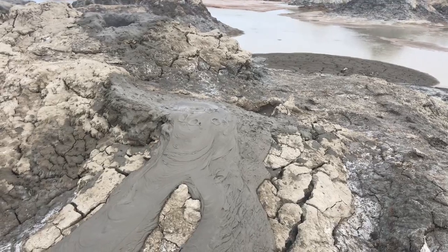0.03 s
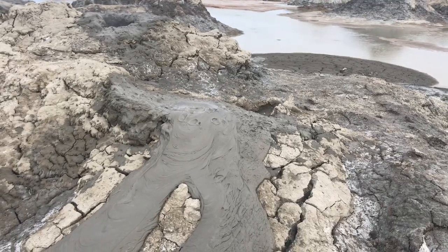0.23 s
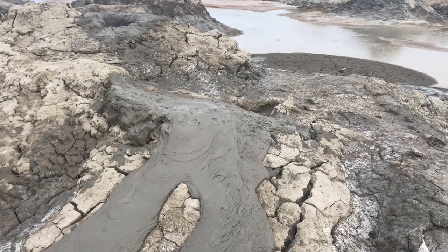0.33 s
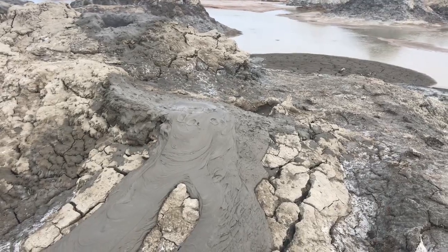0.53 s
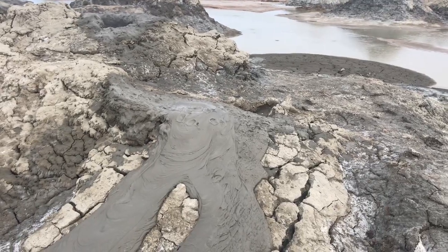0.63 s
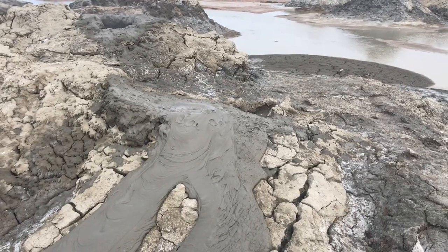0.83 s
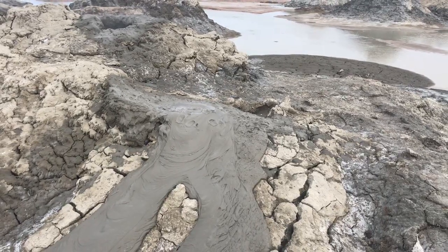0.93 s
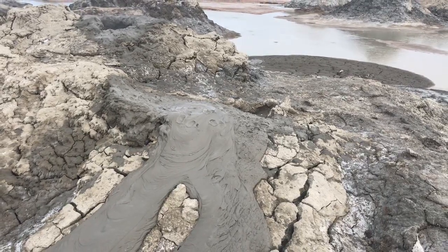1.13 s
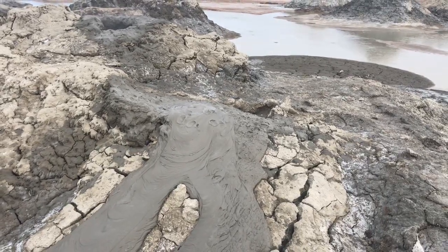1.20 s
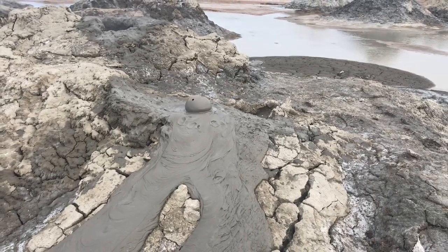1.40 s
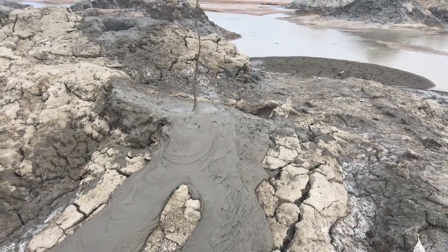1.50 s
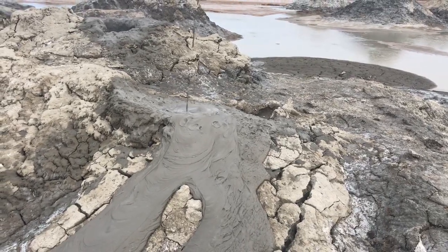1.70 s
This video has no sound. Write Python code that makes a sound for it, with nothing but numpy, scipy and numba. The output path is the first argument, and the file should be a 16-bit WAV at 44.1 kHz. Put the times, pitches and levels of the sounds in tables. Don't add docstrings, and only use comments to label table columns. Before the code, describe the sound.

Gas bubbles bloop and burst through thick wet mud close by, with splats, drips and faint wind rumble.

```python
import sys
import numpy as np
from scipy import signal
from scipy.io import wavfile
from scipy.ndimage import uniform_filter1d
from numba import njit

SR = 44100
rng = np.random.default_rng(int(sys.argv[2]) if len(sys.argv) > 2 else 0)


def put_to_file(sound):
    columns = np.atleast_2d(sound).T
    safe = np.clip(columns, -1, 1)
    whole_steps = np.round(safe * 32767)
    wavfile.write(sys.argv[1], SR, whole_steps.astype(np.int16))


def nominal_scale(level):
    x = np.asarray(level, float) / 20
    return 10 ** x


N = 77175


@njit
def svf(x, hz, width):
    y, band, low = np.empty(len(x)), 0., 0.
    g, k = np.tan(np.pi * hz / SR), width / hz
    for i in range(len(x)):
        v = (band + g * (x[i] - low)) / (1 + g * (g + k))
        band, low, y[i] = 2 * v - band, low + 2 * g * v, k * v
    return y


def unit(x):
    return x / np.sqrt(np.mean(x ** 2))


def smooth(x, size):
    return uniform_filter1d(uniform_filter1d(x, size), size)


def walk(rate, size=N):
    hold = int(SR / rate)
    steps = np.repeat(rng.standard_normal(size // hold + 1), hold)
    return 0.97 * smooth(steps, hold)[:size]


def add(out, s, x):
    i = int(s * SR)
    out[i:i + len(x)] += x[:N - i]


def bands(table, lo_hz, count, flicker_db, rate, tilt_db=0, order=2):
    f, db = np.array(table, float).T
    warm = 8192
    out = 0
    for hz in lo_hz * 2 ** (np.arange(count) / order):
        white = rng.standard_normal(N + warm)
        noise = svf(svf(white, hz, hz / order), hz, hz / order)[warm:]
        colour_db = np.interp(np.log(hz), np.log(f), db) + tilt_db * np.log2(hz / 70)
        out = out + noise * nominal_scale(colour_db + flicker_db * walk(rate))
    return unit(out)


def wind():
    # (time [s], level [dB], tilt [dB per octave])
    gusts = [(0.0, -37.5, -2), (0.1, -47, 1), (0.242, -44, 4), (0.262, -40.5, -3.5), (0.3, -43, 0.5),
             (0.53, -45, 1.5), (0.64, -40, -1), (0.7, -42, -3.5), (0.85, -45.5, 1), (0.9, -40.5, 1.5),
             (0.95, -44, 0.5), (0.98, -40, -3.5), (1.12, -42, -0.5), (1.19, -38, -2), (1.412, -39, -2),
             (1.44, -46, 2), (1.54, -38, -2.5), (1.75, -47.5, 2)]
    # (frequency [Hz], level [dB])
    wind_colour = [(18, -36), (30, -7.5), (50, 0), (80, -3), (151, -16), (220, -19.5), (280, -29),
                   (400, -29.5), (520, -60), (880, -120)]
    s, db, tilt = np.array(gusts).T
    t = np.arange(N) / SR
    tilt_db = np.interp(t, s, tilt)
    rumble = bands(wind_colour, 36.72, count=11, flicker_db=3.5, rate=14.02, tilt_db=tilt_db, order=3)
    hold = int(0.07 * SR)
    return nominal_scale(np.interp(t, s, db)) * rumble / np.sqrt(smooth(rumble ** 2, hold))


def air():
    # (frequency [Hz], level [dB])
    air_colour = [(700, -9), (1350, -3.5), (2600, -11.5), (4900, -20.5), (6200, -11.5), (7200, -17.5),
                  (10300, -23.5), (15500, -22)]
    return nominal_scale(-67) * bands(air_colour, 378.4, count=22, flicker_db=1.0, rate=10.5, order=4)


def ping(hz, t60, tick):
    t = np.arange(int(t60 * SR)) / SR
    tone = np.sin(2 * np.pi * hz * (t + 2 * t ** 2))
    ring = tone * 1000. ** (-t / t60) * (1 - np.exp(-t * hz))
    return ring + tick * np.exp(-t / 0.000081) * np.cos(2 * np.pi * 5000 * t)


def fizz():
    out, per_s = np.zeros(N), 500
    for place, pitch, energy in rng.random((int(per_s * N / SR), 3)):
        hz = 500 * 2 ** (3.165 * pitch)
        level_db = -2.6 * np.log(energy + .02) - 4 * np.log2(hz / 500)
        add(out, place * N / SR, nominal_scale(level_db) * ping(hz, 30 / hz, 0))
    return nominal_scale(-68) * unit(out * nominal_scale(2 * walk(14.2)))


def wet_bursts(table, attack_s):
    out = np.zeros(N)
    t = np.arange(8820) / SR
    for s, t60, db, hz in table:
        env = 1000. ** (-t / t60) * np.clip(t / attack_s, 0, 1)
        rough = nominal_scale(2.5 * walk(700, size=len(t)))
        grains = rng.standard_normal(len(t)) * rough * env
        width = 1.27 * hz
        noise = svf(svf(grains, 1. * hz, width), 1. * hz, width)
        add(out, s, nominal_scale(db) * unit(noise) * np.sqrt(np.mean(env ** 2)))
    return out


def splats():
    # (time [s], t60 [s], level [dB], centre [Hz])
    tears = [(0.197, 0.097, -54, 2830), (0.253, 0.039, -54, 1800), (0.269, 0.056, -57.5, 2500),
             (0.25, .04, -63.5, 9000), (.2, 0.046, -66.5, 10000), (.37, 0.1, -67.5, 8300),
             (0.366, 0.051, -57.5, 2980), (0.15, 0.16, -63.5, 2300), (.296, 0.037, -62, 3300),
             (.315, .05, -60.5, 2600), (.33, .05, -62, 2000), (0.34, 0.04, -58.5, 2400),
             (.406, 0.082, -56, 5700), (.407, .07, -64, 11500), (1.3, .05, -64, 10000),
             (.4, 0.2, -55, 1200), (0.38, 0.06, -65.5, 5300), (.613, 0.2, -58, 1650),
             (0.55, 0.07, -66, 2400), (.65, .05, -58, 1500), (.198, 0.13, -50.5, 450),
             (.252, 0.13, -51.5, 620), (.42, .06, -54.5, 1100), (.33, 0.044, -54, 1000),
             (.93, .08, -66, 700), (1.137, 0.078, -56.5, 1370), (1.452, 0.14, -51, 2450),
             (1.485, 0.12, -62, 4400), (1.546, 0.061, -61.5, 6400), (1.677, 0.043, -61.5, 4000),
             (1.665, 0.051, -57, 1130), (1.31, 0.15, -59.5, 1060), (.955, 0.08, -64.5, 2500),
             (1.2, 0.043, -65, 1300), (1.033, 0.054, -63, 3800)]
    return wet_bursts(tears, attack_s=0.0043)


def glides(table, rise_share):
    out, wobble, flutter = np.zeros(N), walk(300), walk(600)
    for s, length, hz0, hz1, db in table:
        u = np.arange(int(length * SR)) / (length * SR)
        span = slice(int(s * SR), int(s * SR) + len(u))
        small = np.clip(hz0 / 900, 0, 1)
        hz = (hz0 + (hz1 - hz0) * u) * (1 + .025 * small * wobble[span])
        rise = np.clip(u / rise_share, 0, 1)
        fall = np.clip((u - rise_share) / (1 - rise_share), 0, 1)
        env = np.sin(np.pi / 2 * rise) ** 2 * np.cos(np.pi / 2 * fall)
        env = env * unit(nominal_scale(5 * small * flutter[span]))
        add(out, s, np.sqrt(2) * nominal_scale(db) * env * np.sin(2 * np.pi * np.cumsum(hz) / SR))
    return out


def chirps():
    # (start [s], length [s], first pitch [Hz], last pitch [Hz], level [dB])
    openings = [(.1965, 0.02, 240, 620, -35), (.212, 0.042, 528, 555, -49.5), (0.2, 0.043, 1128, 1170, -55),
                (0.255, 0.014, 642, 630, -39.5), (0.25, 0.049, 912, 1004, -51.5),
                (0.279, 0.026, 960, 956, -49), (0.299, 0.025, 429, 341, -50.5),
                (0.611, 0.042, 1572, 1680, -62.5), (.623, 0.0092, 2260, 2350, -61),
                (0.633, 0.01, 2900, 3500, -66.5), (.652, 0.0063, 980, 1870, -53),
                (.654, .008, 1670, 1910, -54), (1.486, 0.006, 700, 795, -41), (1.515, 0.017, 655, 735, -66),
                (.6, 0.028, 229, 198, -52), (1.67, 0.014, 1195, 1400, -59.5)]
    return glides(openings, rise_share=0.083)


def bubble(table):
    s, hz, db = np.array(table, float).T
    t = np.arange(s[0], s[-1], 1 / SR)
    edge = np.clip(np.minimum(t - s[0], s[-1] - t) / 0.0015, 0, 1)
    tone = np.sin(2 * np.pi * np.cumsum(np.interp(t, s, hz)) / SR)
    out = np.zeros(N)
    add(out, s[0], np.sqrt(2) * edge * nominal_scale(np.interp(t, s, db)) * tone)
    return out


def deep_bubble():
    # (time [s], pitch [Hz], level [dB])
    course = [
        (0.198, 163, -35),
        (0.206, 183, -20),
        (0.22, 179.6, -17),
        (0.274, 168, -46),
        (0.284, 180, -65.5),
    ]
    return bubble(course)


def drips():
    # (time [s], pitch [Hz], level [dB], t60 [s])
    drops = [(0.369, 1530, -48, 0.013), (0.373, 3970, -59, 0.0073), (0.382, 2100, -50, 0.013),
             (0.4066, 2900, -40, 0.0062), (0.4067, 7500, -58, 0.006), (0.4058, 11900, -56, .005),
             (0.4118, 2460, -46, 0.016), (0.4135, 4200, -53, 0.011), (0.412, 8400, -61, 0.022),
             (0.816, 4350, -65, 0.008), (1.077, 4380, -65, 0.005), (1.087, 6940, -55, 0.004),
             (1.087, 2030, -56, 0.009), (1.125, 13200, -62, 0.004), (.334, 3300, -64, .012),
             (.204, 5800, -62, .02), (.272, 3000, -60, .02), (.667, 4150, -68, .015),
             (.703, 2150, -60, .012), (1.514, 9300, -57, 0.0023), (1.52, 7040, -67, .01),
             (1.5405, 3250, -47, 0.008), (1.5403, 11200, -44, 0.0023), (1.5472, 6860, -48.5, 0.0048),
             (1.552, 3050, -56, 0.014), (1.574, 3900, -61, 0.009), (1.681, 10100, -64, .004),
             (.2, 4000, -55, 0.018), (.83, 2380, -59, 0.01), (.252, 1400, -47, .01),
             (.703, 780, -49, 0.013), (0.935, 950, -55, 0.014), (.285, 1250, -52, 0.018),
             (1.04, 2660, -63.5, 0.018), (1.011, 3340, -66, 0.013)]
    out = np.zeros(N)
    for s, hz, db, t60 in drops:
        add(out, s, 2 * nominal_scale(db) * ping(hz, t60, nominal_scale(-18.5)))
    return out


def swells():
    # (start [s], length [s], first pitch [Hz], last pitch [Hz], level [dB])
    whistles = [
        (.216, 0.042, 179.5, 339, -30.5),
        (.26, 0.031, 625, 985, -47),
        (1.135, 0.0188, 1242, 1800, -58.5),
        (1.312, 0.038, 1035, 1350, -62.5),
        (1.385, 0.025, 2126, 2460, -66),
        (1.43, 0.035, 599, 1164, -54.5),
        (1.462, 0.028, 1238, 2070, -51),
        (1.47, 0.041, 4150, 4500, -69),
    ]
    return glides(whistles, rise_share=.6)


def specks():
    # (time [s], t60 [s], level [dB], centre [Hz])
    landings = [(.2522, .012, -54, 1500), (.3684, .012, -57, 3000), (.4063, .012, -51, 6000),
                (.625, .015, -53, 1800), (.781, .01, -62, 2500), (.934, .02, -54, 900),
                (1.076, .01, -62, 6000), (1.0855, .01, -55, 4500), (1.1, .01, -64, 4500),
                (1.5396, .012, -55, 5000), (1.5145, .01, -61, 6000), (1.6783, .012, -60, 7000)]
    return wet_bursts(landings, attack_s=0.00058)


def low_thumps():
    # (start [s], length [s], first pitch [Hz], last pitch [Hz], level [dB])
    thumps = [
        (.59, 0.031, 119, 139, -43),
        (.625, 0.042, 59.6, 66, -35),
        (0.831, .042, 58, 63.6, -34),
        (1.055, .03, 81, 75, -40),
        (1.135, 0.04, 150.3, 120.3, -44.5),
        (1.225, 0.033, 90.5, 120, -39.5),
        (1.235, 0.042, 203, 225, -52),
        (1.27, 0.032, 106, 92, -33.5),
        (1.32, .04, 74, 79, -41),
    ]
    return glides(thumps, rise_share=.6)


def bursting_bubble():
    # (time [s], pitch [Hz], level [dB])
    course = [
        (1.4646, 237, -43),
        (1.471, 270, -25),
        (1.481, 339, -29),
        (1.4865, 400, -27),
        (1.4892, 572, -30),
        (1.4934, 650, -35),
        (1.498, 715, -29),
        (1.504, 858, -37),
        (1.513, 1080, -50),
    ]
    return bubble(course)


def scene():
    around = wind() + air() + fizz()
    tones = chirps() + deep_bubble() + swells() + low_thumps() + bursting_bubble()
    thrown_mud = splats() + drips() + specks()
    return (around + tones + thrown_mud)[None]


def roll_off(x):
    return signal.sosfilt(signal.butter(12, 15710, fs=SR, output="sos"), x)


def record(dry):
    low_cut = signal.butter(3, 46, "high", fs=SR, output="sos")
    top_cut = signal.ellip(8, .3, 60, 15650, fs=SR, output="sos")
    mix = signal.sosfilt(np.vstack([low_cut, top_cut]), dry)
    return roll_off(mix)


dry = scene()
out = record(dry)
put_to_file(out)
```